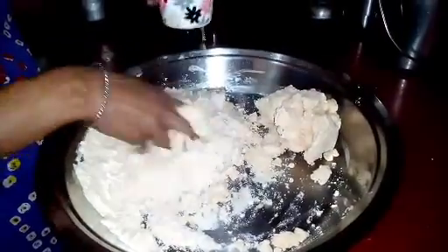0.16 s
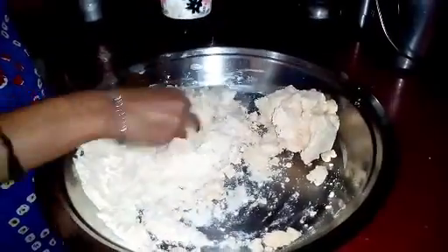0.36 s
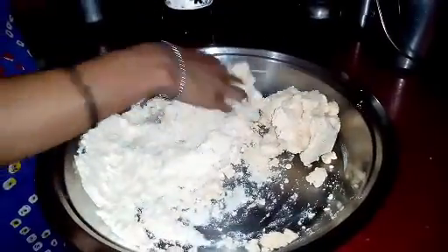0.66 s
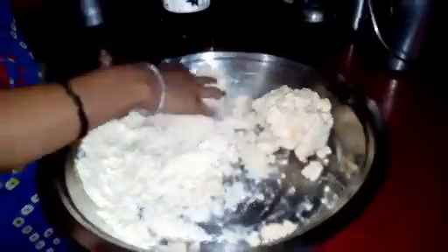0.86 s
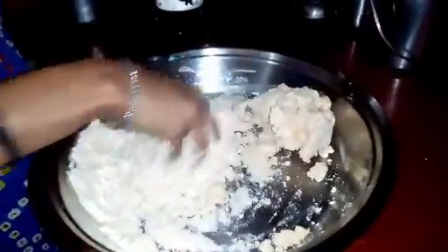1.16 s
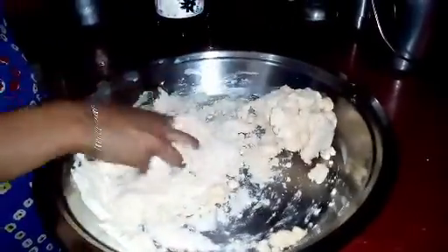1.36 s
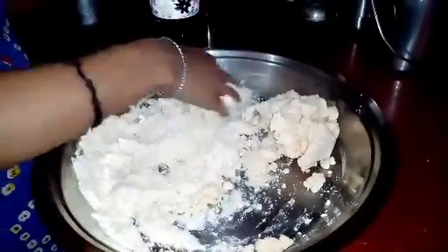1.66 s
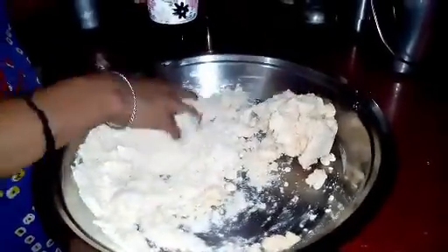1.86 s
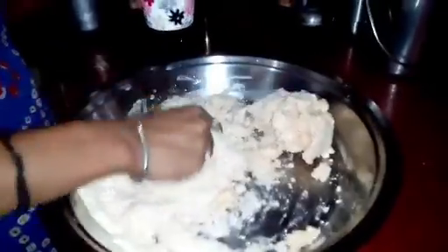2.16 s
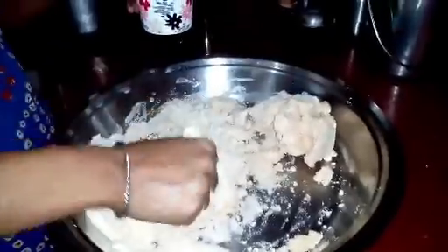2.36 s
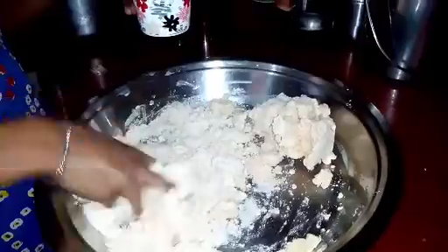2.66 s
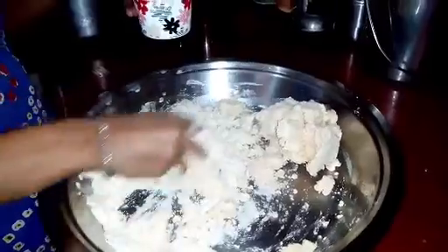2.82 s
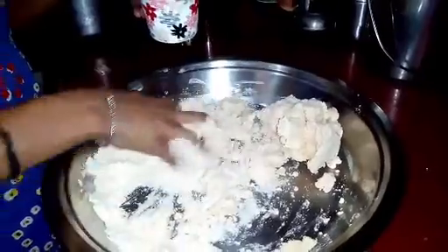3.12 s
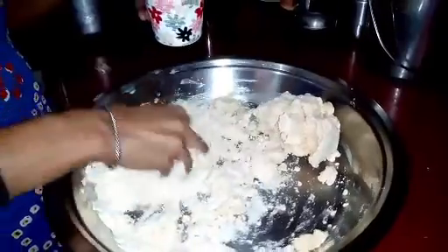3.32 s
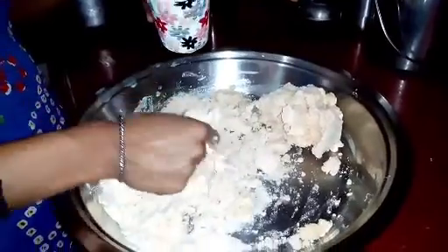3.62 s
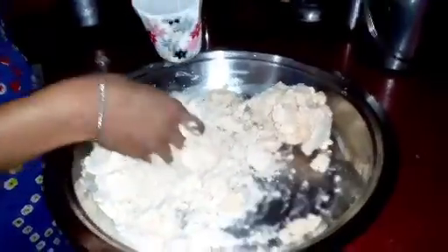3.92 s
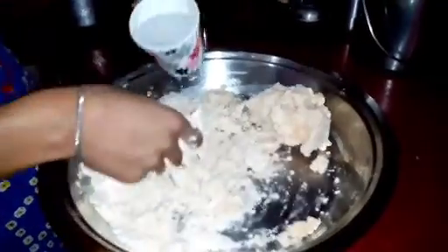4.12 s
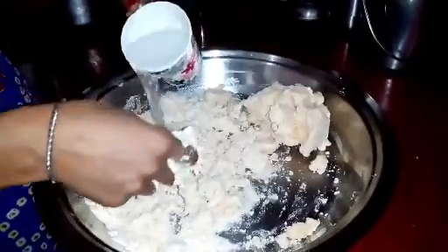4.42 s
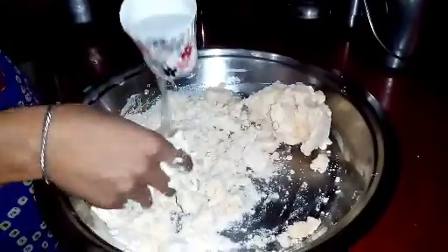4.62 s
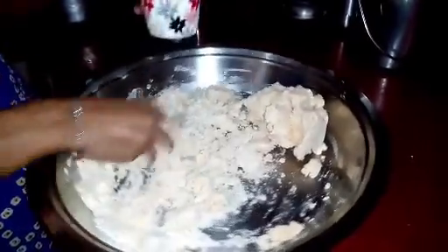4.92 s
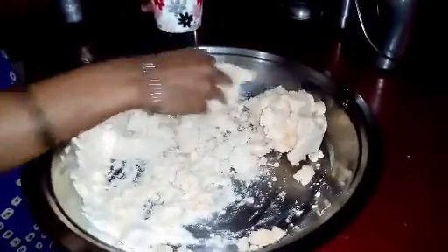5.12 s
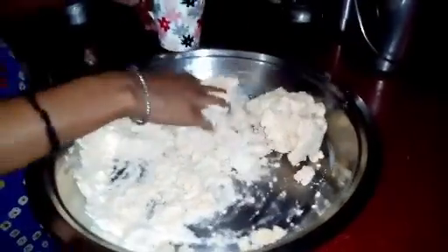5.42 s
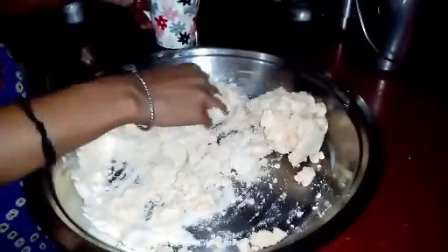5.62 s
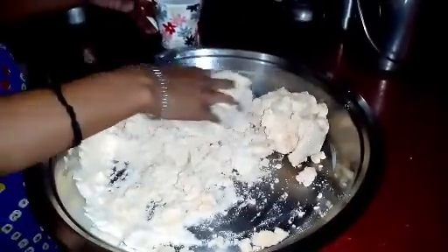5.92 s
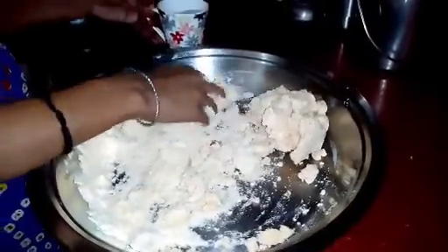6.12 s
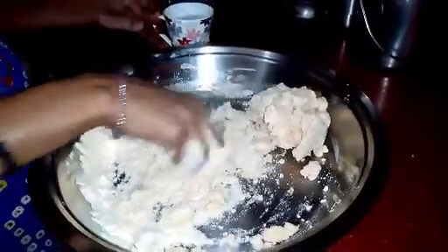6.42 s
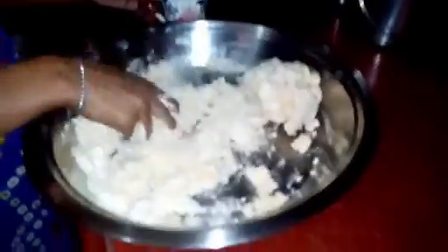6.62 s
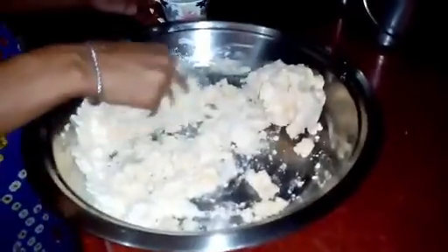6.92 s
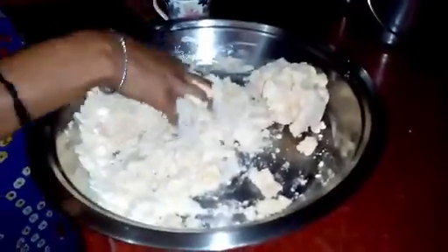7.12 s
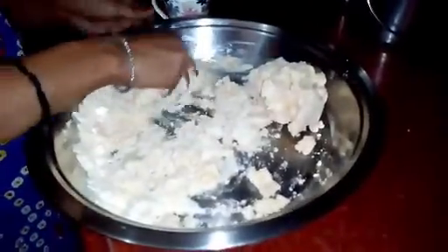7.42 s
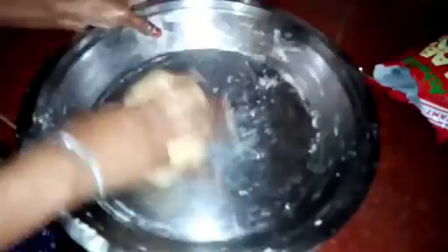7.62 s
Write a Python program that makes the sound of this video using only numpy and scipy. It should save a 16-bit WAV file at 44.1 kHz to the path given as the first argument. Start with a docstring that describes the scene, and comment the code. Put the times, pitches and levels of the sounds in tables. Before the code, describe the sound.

Fingers sweep through dry flour and crumbly dough on a wide steel plate, hissing softly, with sharp metallic knocks around five seconds in a small kitchen.

```python
"""Small, live kitchen: a hand works flour and crumbly dough on a wide steel plate.
Still air, a wavering hum and faint far sounds (filtered noise) lie behind; sound cuts out briefly near the end.
Fingertips drag on bare steel (sliding narrow noise). Knocks, thumps, digs and taps set off
clatter (decaying noise) and plate modes (decaying sines).
Strokes sweep through the flour: random slips convolved with the damped ring of the plate."""
import sys
import numpy as np
from scipy import signal
from scipy.fft import rfft, irfft
from scipy.io import wavfile
from scipy.ndimage import uniform_filter1d

SR = 44100
rng = np.random.default_rng(int(sys.argv[2]) if len(sys.argv) > 2 else 0)


def pcm_store(signal):
    """Save signal as 16-bit PCM."""
    levels = np.round(np.clip(np.atleast_2d(signal), -1, 1) * 32767)
    wavfile.write(sys.argv[1], SR, levels.astype(np.int16).T)


N = 342858

# microphone pair, likeness: (frequency [Hz], left-right correlation [0-1])
LIKENESS = [(100, .94), (300, .8), (650, .65), (1300, .1), (4000, 0), (16000, 0)]
# microphone pair, balance: (frequency [Hz], left minus right [dB])
BALANCE = [(100, -7.5), (300, -6), (700, -5), (1300, -5), (2400, -3), (4400, -4.6), (8000, -2), (10000, -6),
           (15000, -12)]
SIDES = np.array([[0.5], [-0.5]])  # left and right share a difference equally
# silent break: (start [s], end [s])
BREAK_S = (7.519, 7.641)
BAND_LIMIT_HZ = 15850

# colour of still air: (frequency [Hz], relative density [dB])
AIR_COLOUR = [(15, -57.5), (25, -24.5), (82, -6.5), (123, -5), (179, -12), (241, -6), (654, -11), (749, -9),
              (1220, -14.5), (2460, -18), (3390, -48.5), (7630, -54), (8970, -37), (15800, -54)]
AIR_DB = -69
# appliance hum: (frequency [Hz], level before common trim and balance [dB])
HUM_PARTIALS = [(96.9, -75.5), (140.0, -76.5), (258.4, -84), (328.4, -80.5)]
# far sounds: (time [s], length [s], centre [Hz], width [Hz], level [dB])
FAR_SOUNDS = [(-.005, 0.042, 323, 36, -56), (0.108, .11, 750, 63, -74), (0.727, .1, 55, 18, -71),
              (1.398, .12, 55, 15, -73), (2.029, 0.19, 716, 200, -58), (3.678, 0.14, 800, 134, -62),
              (3.845, 0.054, 720, 130, -67), (4.096, 0.18, 790, 124, -66.5), (4.281, .03, 1380, 98, -69),
              (5.738, 0.081, 760, 150, -56), (6.492, 0.19, 800, 83, -59), (6.854, 0.087, 896, 96, -60.5)]
# fingertips on bare steel: (time [s], length [s], start [Hz], end [Hz], width [Hz], level [dB])
DRAGS = [(0.912, 0.061, 1962, 1844, 350, -60.5), (1.77, 0.16, 2167, 1990, 400, -54.5),
         (2.755, 0.22, 1883, 1654, 155, -63), (2.958, .07, 4900, 4760, 500, -55),
         (2.979, 0.06, 1724, 1655, 90, -63.5), (3.487, 0.22, 3260, 3300, 277, -65.5),
         (4.046, 0.16, 3240, 3280, 278, -62), (4.554, 0.028, 4350, 4390, 89, -54.5),
         (4.559, 0.17, 3310, 3280, 222.6, -60.5), (5.03, 0.043, 4190, 4380, 110.3, -54),
         (6.235, 0.046, 2560, 2580, 172, -45), (6.234, 0.038, 4580, 4640, 140.6, -46),
         (6.257, 0.058, 324, 336.4, 59.4, -55), (6.406, 0.058, 1650, 1680, 89, -58),
         (6.5, 0.047, 4320, 4340, 260, -48)]

# edges of the blow bands: (frequency [Hz])
BLOW_EDGES_HZ = [60, 190, 600, 1250, 3000, 5700, 8500, 16000]
# broad colour of the struck plate: (frequency [Hz], relative density [dB])
STEEL_COLOUR = [(60, 5), (140, -14.5), (260, 4), (430, 7), (620, -7.5), (900, -3), (1300, -8.5),
                (2100, 3.5), (2600, -2), (3100, -4), (3800, 8), (5200, 2.5), (7600, -5.5), (9300, -16.5),
                (12700, -17), (15000, -7.5)]
# plate modes, damped by the dough: (frequency [Hz], relative level [dB], T60 [s])
PLATE_MODES = [(142, -3, .8), (237, -5, .35), (331, -6, .5), (504, -1, .4), (727, -9, .35), (802, -6, .45),
               (880, -8, .4), (1010, 0, .5), (1050, -5, .45), (1302, -6, .5), (1389, -6, .45),
               (1850, -2, .55), (1918, -5, .5), (2215, -6, .4), (2538, -8, .5), (3751, -7, .45),
               (4223, -8, .45), (4355, -9, .55), (4645, -6, .42), (4726, -7, .45), (5147, -9, .55),
               (5196, -6, .4), (5523, -10, .5), (6158, -9, .5), (7508, -6, .4)]
# partials favoured by each struck spot: name: (boost [dB], partials [Hz])
SPOTS = {"a": (14, [488, 1430, 2100, 3720, 4620, 5240]),
         "b": (8.8, [640, 780, 1080, 1750, 2200, 4700, 5850]),
         "c": (7.4, [300, 500, 1010, 1180, 1850, 4370, 5170]), "d": (8.3, [760, 1100])}
# spot under the thumps: (boost [dB], partials [Hz])
THUMP_SPOT = (8.2, [150, 242, 1480, 1640, 2030])
# spot with no favoured partial: (boost [dB], partials [Hz])
NO_SPOT = (0, [])
# spectrum of each kind of blow: (relative level in each blow band [dB])
KNOCK_BANDS_DB = [-30.5, -18, -12, -6, -1.5, -6, -19]
THUMP_BANDS_DB = [8, 12.5, 13.5, 19.5, -7, -6, -23]
DIG_BANDS_DB = [-36, -26, -16, -4.5, -2.5, 1, -2.5]
TAP_BANDS_DB = [-5, -14, 1, -6, -23, 0.5, -26]
# fraction of low thud and of mid clang added to each blow band: (share [0-1])
THUD_SHARE = np.array(np.array([1, .4, 0, 0, 0, 0, 0]))
CLANG_SHARE = np.array(np.array([0, 0, 1, 0, 0, 0, 0]))
# hard knocks on the plate, the first two as a cup is set down on its rim: (time [s], rise [s], clatter T60 [s],
# room tail [dB], ring [dB], # level [dB], brightness [dB/octave], thud [dB], clang [dB], spot name)
KNOCKS = [(4.794, 0.002, 0.2, -13.5, -5, -32, -1, -1.5, -11, "a"),
          (4.816, 0.0023, 0.14, -10, -15.5, -33.5, 0.5, 0.5, -11, "a"),
          (5.134, 0.01, 0.089, -3.5, -9.5, -33, -1, -9.5, 7.5, "b"),
          (5.222, 0.012, 0.19, -31, -17, -51, -2.5, 2.5, 9, "b"),
          (5.4986, 0.0023, 0.049, -7, -0.5, -36.5, -4.5, -3, 7, "c"),
          (5.647, 0.0054, 0.097, -10.5, -6, -40, 2.5, 12, 4.5, "c"),
          (7.64, 0.011, .023, -53, -46, -53.5, 8, 26, 30.5, "d")]
# hand thumps through dough: (time [s], rise [s], clatter T60 [s], room tail [dB],
# level [dB], brightness [dB/octave], thud [dB])
THUMPS = [(6.6415, 0.0017, 0.036, -13, -52.5, 1.5, -0.5), (6.674, 0.0022, 0.082, -8, -64, -0.5, 2),
          (6.858, .004, 0.25, -8, -87.5, -4, 6.5)]
# fingertips dig in and meet steel: (time [s], rise [s], clatter T60 [s], room tail [dB],
# level [dB], brightness [dB/octave])
DIGS = [(.743, 0.0069, .1, -3, -61.5, 2.5), (1.633, .0067, 0.18, 2, -50.5, 1.5),
        (1.752, 0.015, 0.2, -7, -45, 2), (2.725, 0.0064, .1, 5, -47.5, -1),
        (4.556, .005, .15, -1, -68.5, 0.5), (6.236, 0.0056, 0.18, 6, -41.5, -2),
        (6.256, .0045, .067, 0, -49.5, 5)]
# light taps on steel: (time [s], level [dB])
TAPS = [(.17, -70.5), (.412, -75), (.595, -77.5)]
TAP_RISE_S, TAP_T60_S, TAP_TAIL_DB = 0.0033, 0.14, -3
THUMP_RING_DB, DIG_RING_DB, TAP_RING_DB = -10, -17, -22
TILT_PIVOT_HZ, TILT_FLOOR_HZ = 4000, 400

# edges of scrape, hiss and fizz: (frequency [Hz])
SWEEP_EDGES_HZ = [500, 2900, 8500, 16000]
# colour of sweeping: (frequency [Hz], relative density [dB])
FLOUR_COLOUR = [(300, -25.5), (650, -27), (950, -14.5), (1360, -25), (1750, -15), (2300, -12.5),
                (3050, -12), (4200, 1.5), (5900, 3.5), (8500, -6.5), (10000, -15.5), (12700, -15.5),
                (15000, -5.5), (16000, -11)]
# floor of scrape, hiss and fizz between strokes: (level [dB])
RESTING_DB = [-81, -82.5, -92.5]
# finger strokes: (start [s], rise [s], length [s], steel scrape [dB], flour hiss [dB], finest fizz [dB])
STROKES = [(0.136, 0.15, 0.12, -65, -62.0, -83), (0.675, 0.089, 0.57, -65.9, -60.5, -73),
           (0.885, 0.058, 0.23, -68, -51.5, -59.5), (1.148, 0.17, 0.15, -65.5, -51, -57),
           (1.61, 0.12, 0.37, -52, -44.5, -51), (2.039, 0.039, 0.31, -100, -58.5, -61.5),
           (2.569, 0.23, 0.31, -57.0, -49, -54.5), (2.846, 0.11, 0.2, -57.6, -46, -58),
           (3.069, 0.053, 0.24, -81, -54, -60.5), (3.339, 0.23, 0.45, -74.5, -53, -60.5),
           (3.988, 0.13, 0.3, -69.5, -53.5, -61), (4.536, 0.078, 0.19, -63.5, -51.5, -55.5),
           (4.999, 0.16, 0.14, -57, -45.5, -48.5), (5.505, 0.097, 0.13, -49, -40, -50.5),
           (6.33, 0.13, 0.23, -53, -42, -54.0), (6.614, 0.038, 0.12, -71, -50.5, -61.7),
           (6.954, 0.049, 0.27, -67.5, -51, -58), (7.439, 0.058, 0.058, -76, -53.5, -61.1)]
# fade of scrape, hiss and fizz; loose flour that fizzes is soon pushed aside:
# (sag from the start [dB/s], further release after the length [dB/s])
STROKE_FADES = [(1, 110.5), (1, 122.5), (11, 126)]
PRESS_EXPONENT = 1.48  # pressure amplitude against rise fraction


def gain_of(db):
    """Decibels to amplitude."""
    return 10 ** (np.asarray(db) / 20)


def read(points, hz):
    """Table joined by straight lines on a log-frequency axis."""
    f, value = np.transpose(points)
    return np.interp(np.log(hz + 1), np.log(f + 1), value)


def bins(x):
    """Frequencies of the spectrum of x, Hz."""
    return np.fft.rfftfreq(x.shape[-1], 1 / SR)


def shaped(x, gain):
    """Filter x by a gain for each frequency."""
    return irfft(rfft(x) * gain, x.shape[-1])


def band(x, lo_hz, hi_hz):
    """One band of x, with soft edges."""
    hz = bins(x) + 1
    highpass_power = 1 + (lo_hz / hz) ** 20
    lowpass_power = 1 + (hz / hi_hz) ** 20
    return shaped(x, 1 / np.sqrt(highpass_power * lowpass_power))


def evened(pair, count=None):
    """Scale a stereo pair so that the first count samples of its mid have rms 1."""
    return pair / np.sqrt(np.mean(pair.mean(0)[:count] ** 2) + 1e-20)


def add(mix, start_s, sound):
    """Mix a stereo sound in at start_s."""
    part = mix[:, max(round(start_s * SR), 0):][:, :sound.shape[1]]
    part += sound[:, :part.shape[1]]


def diffuse(size):
    """Noise at two microphones: alike in the bass, unrelated in the treble, louder on the right."""
    a, b = rng.standard_normal((2, size))
    hz = bins(a)
    same = np.clip(read(LIKENESS, hz), -1, 1)
    other = shaped(a, same) + shaped(b, np.sqrt(1 - same ** 2))
    return shaped(np.array([a, other]), gain_of(SIDES * read(BALANCE, hz)))


def waver(knots_per_s):
    """Random curve: straight lines between unit normal knots."""
    knots = rng.standard_normal(int(N / SR * knots_per_s) + 2)
    return np.interp(np.arange(N) / SR * knots_per_s, np.arange(len(knots)), knots)


def kitchen(hum_trim_db=-1.5, hum_waver_db=3, phase_drift_turns=0.16, resume_db=-3):
    """Still air as coloured noise, appliance hum as wavering sines; both quieter after the break."""
    t = np.arange(N) / SR
    air = diffuse(N)
    air = gain_of(AIR_DB) * evened(shaped(air, gain_of(read(AIR_COLOUR, bins(air)))))
    hum = np.zeros(N)
    for hz, db in HUM_PARTIALS:
        level = gain_of(db + hum_trim_db + hum_waver_db * waver(7.8))
        turns = hz * t + phase_drift_turns * waver(8)
        hum += level * np.sin(2 * np.pi * turns)
    balance = gain_of([[-4.5], [3]])
    return (air + np.sqrt(2) * hum * balance) * gain_of(resume_db * (t > BREAK_S[1]))


def far_sound(length_s, centre_hz, width_hz, db, room_t60_s=0.31):
    """Dull, narrow noise, smeared by the house on its way; it dies away from half its length."""
    t = np.arange(16384) / SR
    noise = diffuse(len(t))
    tone = shaped(noise, 1 / (1 + ((bins(noise) - centre_hz) / (1.33 * width_hz)) ** 4))
    decay = gain_of(-60 * np.maximum(t - length_s / 2, 0) / room_t60_s)
    swell = np.minimum(t / 0.0095, 1) * decay
    return gain_of(db) * evened(tone * swell, int(abs(length_s) * SR * 0.33) + 1)


def drag(length_s, start_hz, end_hz, width_hz, db, room_t60_s=0.46):
    """Fingertip sticks and slips on bare steel: a breathy whistle that slides with the stroke."""
    t = np.arange(32768) / SR
    noise = diffuse(len(t))
    tone = shaped(noise, 1 / (1 + (2 * (bins(noise) - start_hz) / width_hz) ** 2))
    shift_hz = np.interp(t, [0, length_s], [0, end_hz - start_hz])
    slide_turns = np.cumsum(shift_hz) / SR
    tone = (signal.hilbert(tone) * np.exp(2j * np.pi * slide_turns)).real
    decay = gain_of(-60 * np.maximum(t - length_s, 0) / room_t60_s)
    swell = np.minimum(t / 0.026, 1) * decay
    return gain_of(db) * evened(tone * swell, int(abs(length_s) * SR) + 1)


def accent(spot, hz, width_hz=65):
    """Boost in dB at hz from the struck spot's partials; width_hz holds at 1 kHz and grows with pitch."""
    boost_db, partials_hz = spot
    return sum(boost_db * np.exp(-((hz - centre) / width_hz) ** 2 / (centre / 1000))
               for centre in partials_hz)


def brightened(spectrum_db, db_per_octave):
    """A harder contact tilts the spectrum of a blow towards the treble."""
    edges_hz = np.array(BLOW_EDGES_HZ)
    centres_hz = np.maximum(np.sqrt(edges_hz[:-1] * edges_hz[1:]), TILT_FLOOR_HZ)
    return np.array(spectrum_db) + db_per_octave * np.log2(centres_hz / TILT_PIVOT_HZ)


def mode(t, age, hz, level_db, t60_s):
    """One plate mode: a decaying sine, out of step at the two microphones when high."""
    phase = 2 * np.pi * rng.random() + SIDES * np.arccos(read(LIKENESS, hz))
    side_db = level_db + SIDES * read(BALANCE, hz)
    return np.sqrt(2) * gain_of(side_db - 60 * age / t60_s) * np.sin(2 * np.pi * hz * t + phase)


def blow(spot, rise_s, clatter_t60_s, tail_db, ring_db, band_db, modes_db=-3.0, crack=1.1,
         crack_s=0.0021, uneven_db=5.5, spot_share=0.25):
    """A crack, a short dense clatter of steel, the room's tail, and the plate's modes ringing on."""
    t = np.arange(32768) / SR
    steel = diffuse(len(t))
    hz = bins(steel)
    # dense upper modes bunch into clusters, different for each blow
    clusters = rng.standard_normal(200)
    clusters_db = uneven_db * np.interp(hz, np.linspace(0, SR / 2, len(clusters)), clusters)
    steel = shaped(steel, gain_of(read(STEEL_COLOUR, hz) + accent(spot, hz) + clusters_db))
    attack = np.minimum(t / max(rise_s, 1e-4), 1)
    age = np.maximum(t - rise_s, 0)
    # a slow rise weakens the crack
    clatter = gain_of(-60 * age / clatter_t60_s) + crack * np.exp(-(age + rise_s) / crack_s)
    out = np.zeros_like(steel)
    for lo, hi, db in zip(BLOW_EDGES_HZ, BLOW_EDGES_HZ[1:], band_db):
        room_t60_s = np.interp(lo, [1000, 8500], [0.63, 0.31])
        tail = gain_of(tail_db - 60 * age / room_t60_s)
        part = evened(band(steel, lo, hi)) * np.hypot(clatter, tail)
        for mode_hz, mode_db, mode_t60_s in PLATE_MODES:
            if lo <= mode_hz < hi:
                level_db = modes_db + ring_db + mode_db + spot_share * accent(spot, mode_hz)
                part += mode(t, age, mode_hz, level_db, mode_t60_s)
        out += gain_of(db) * evened(part * attack, 1323)  # level set over the first 30 ms
    return out


def blows(lowest_hz=88):
    """Knocks, thumps, digs and taps set off one plate, too small to radiate deep bass."""
    out = np.zeros((2, N))
    for s, rise_s, t60_s, tail_db, ring_db, db, tilt, thud_db, clang_db, spot in KNOCKS:
        band_db = db + brightened(KNOCK_BANDS_DB, tilt) + thud_db * THUD_SHARE + clang_db * CLANG_SHARE
        add(out, s, blow(SPOTS[spot], rise_s, t60_s, tail_db, ring_db, band_db))
    for s, rise_s, t60_s, tail_db, db, tilt, thud_db in THUMPS:
        band_db = db + brightened(THUMP_BANDS_DB, tilt) + thud_db * THUD_SHARE
        add(out, s, blow(THUMP_SPOT, rise_s, t60_s, tail_db, THUMP_RING_DB, band_db))
    for s, rise_s, t60_s, tail_db, db, tilt in DIGS:
        band_db = db + brightened(DIG_BANDS_DB, tilt)
        add(out, s, blow(NO_SPOT, rise_s, t60_s, tail_db, DIG_RING_DB, band_db))
    for s, db in TAPS:
        band_db = db + np.array(TAP_BANDS_DB)
        add(out, s, blow(NO_SPOT, TAP_RISE_S, TAP_T60_S, TAP_TAIL_DB, TAP_RING_DB, band_db))
    highpass = signal.butter(4, lowest_hz, "highpass", fs=SR, output="sos")
    return signal.sosfilt(highpass, out)


def pressing(t, levels_db, sag_db_per_s, release_db_per_s):
    """Strength of one layer of the strokes: each builds up, sags, and dies away."""
    power = np.zeros(len(t))
    for (start_s, rise_s, length_s, *_), db in zip(STROKES, levels_db):
        age = np.maximum(t - start_s, 0)
        fade_db = sag_db_per_s * age + release_db_per_s * np.maximum(age - length_s, 0)
        build = np.minimum(age / rise_s, 1) ** PRESS_EXPONENT
        power += (build * gain_of(db - fade_db)) ** 2
    return np.sqrt(power)


def crumb_slips(crumbs_per_s=2500, crumb_db=-1.0, powder=0.27, stutter_db=-0.7):
    """Sparse crumb slips over a steady powder noise, as the fingers stick and slide."""
    size = gain_of(crumb_db * np.minimum(rng.exponential(1, N), 5))
    crumbs = size * (rng.random(N) < crumbs_per_s / SR)
    return rng.standard_normal(N) * (powder + crumbs) * gain_of(stutter_db * waver(58))


def sweeping(plate_t60_s=0.055, contact_s=0.00079, contact_gain=1 / 0.56, moves_per_s=4, spots=6):
    """Crumbs slip under the fingers; each slip sets off the dense, quickly damped ring of the plate."""
    t = np.arange(N) / SR
    slips = crumb_slips()
    age = t[:4096]
    decay = gain_of(-60 * age / plate_t60_s) + contact_gain * np.exp(-age / contact_s)
    # the hand wanders over several spots; each rings in its own way
    nearness = np.exp(2 * np.array([waver(moves_per_s) for _ in range(spots)]))
    nearness /= np.linalg.norm(nearness, axis=0)
    sound = np.zeros((2, N))
    for near in nearness:
        ring = evened(diffuse(len(age)) * decay)
        sound += signal.oaconvolve((slips * near)[None], ring, axes=1)[:, :N]
    sound = shaped(sound, gain_of(read(FLOUR_COLOUR, bins(sound))))
    frames = t[::64]
    working = frames < BREAK_S[1]  # no stroke carries on past the break
    out = np.zeros((2, N))
    layers = zip(SWEEP_EDGES_HZ, SWEEP_EDGES_HZ[1:], np.transpose(STROKES)[3:], STROKE_FADES, RESTING_DB)
    for lo, hi, levels_db, fade, rest_db in layers:
        level = np.hypot(working * pressing(frames, levels_db, *fade), gain_of(rest_db))
        out += evened(band(sound, lo, hi)) * np.interp(t, frames, level)
    return out


def scene():
    """The hand on the plate, over the sounds of the house."""
    mix = kitchen()
    for s, *sound in FAR_SOUNDS:
        add(mix, s, far_sound(*sound))
    for s, *stroke in DRAGS:
        add(mix, s, drag(*stroke))
    return mix + blows() + sweeping()


def record(dry):
    """Sound cuts out for a moment; then the band limit."""
    t = np.arange(N) / SR
    outside = (t < BREAK_S[0]) | (t > BREAK_S[1])
    live = uniform_filter1d(1.0 * outside, size=64)
    lowpass = signal.firwin(401, BAND_LIMIT_HZ, window=("kaiser", 9), fs=SR)
    return signal.oaconvolve(dry * live, lowpass[None], "same")


dry = scene()
out = record(dry)
pcm_store(out)
```